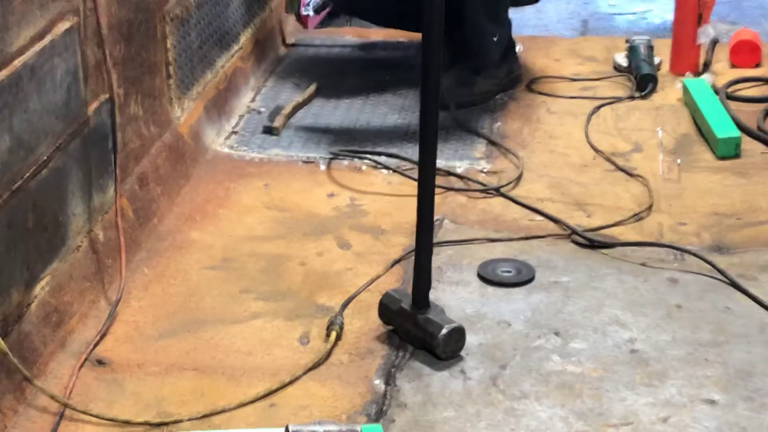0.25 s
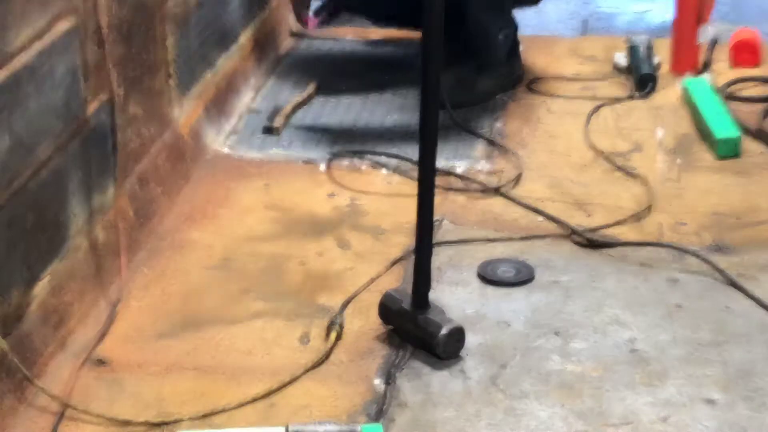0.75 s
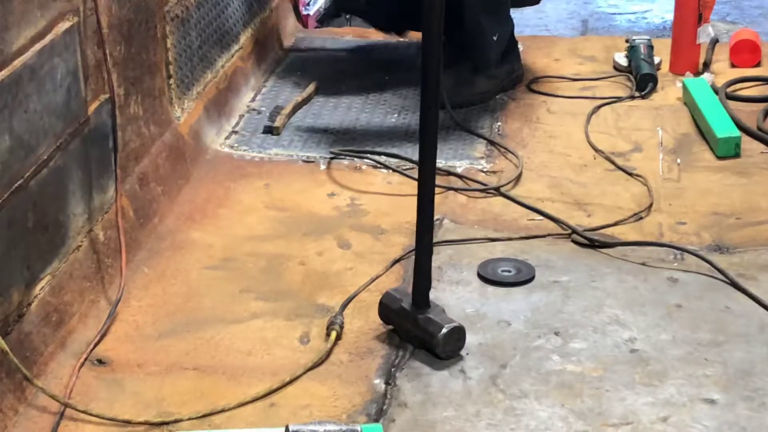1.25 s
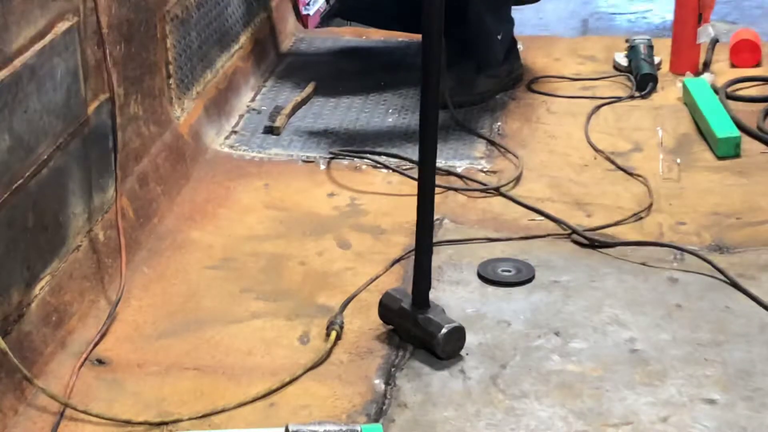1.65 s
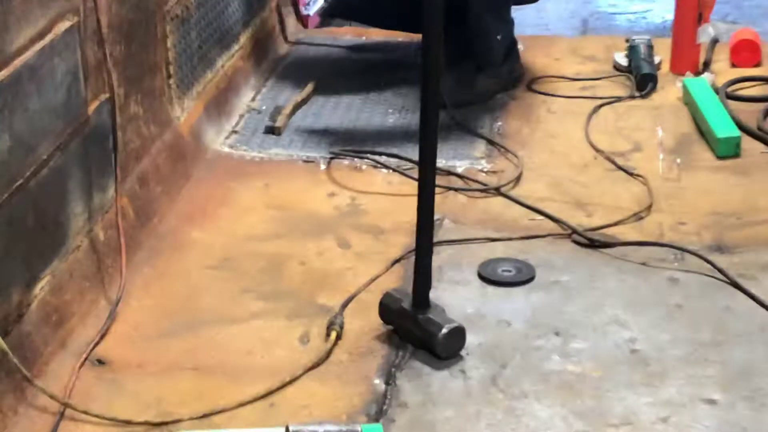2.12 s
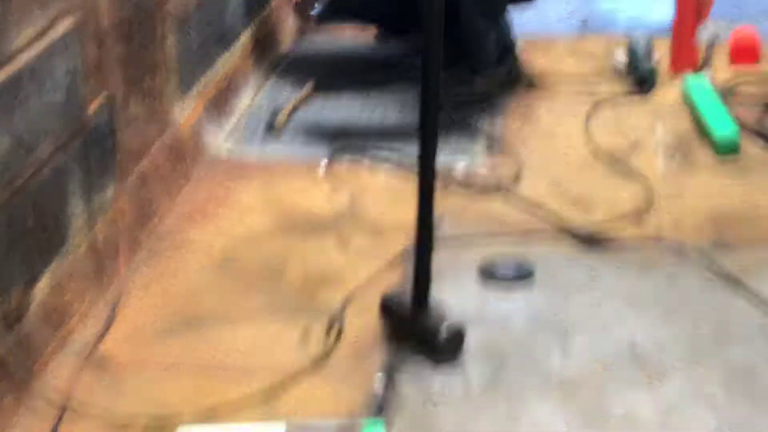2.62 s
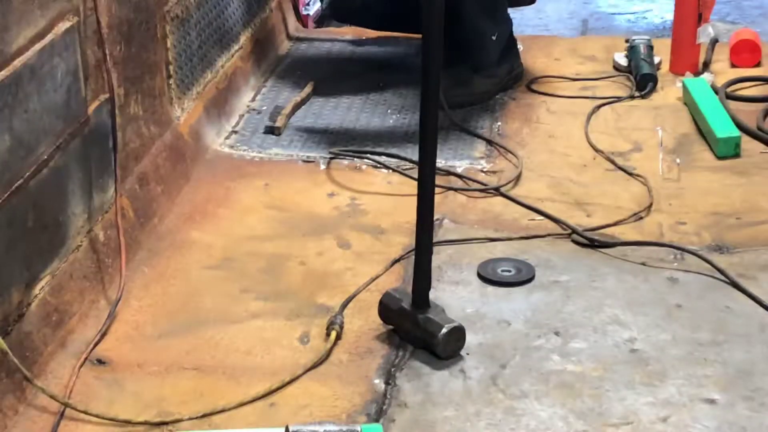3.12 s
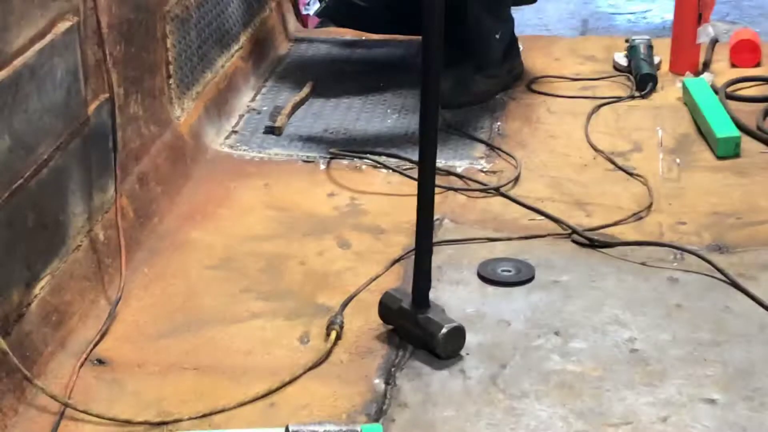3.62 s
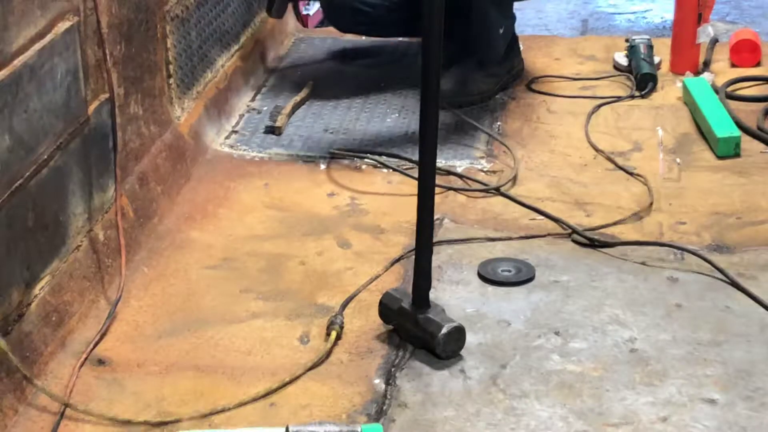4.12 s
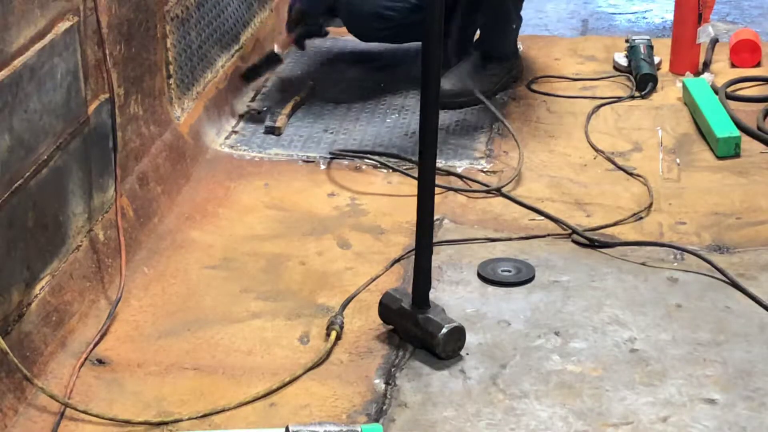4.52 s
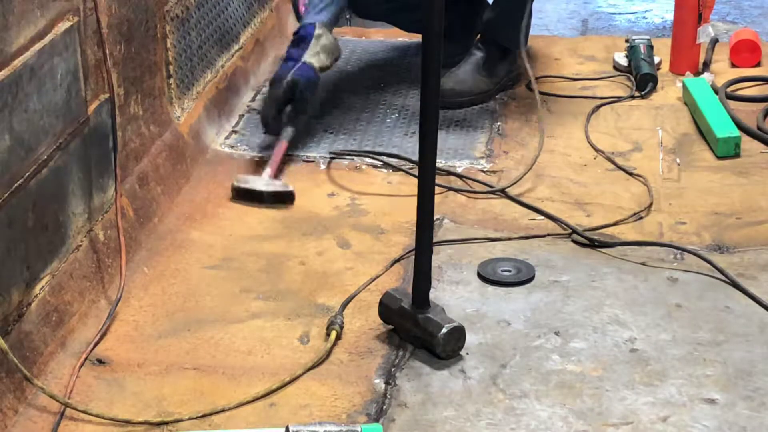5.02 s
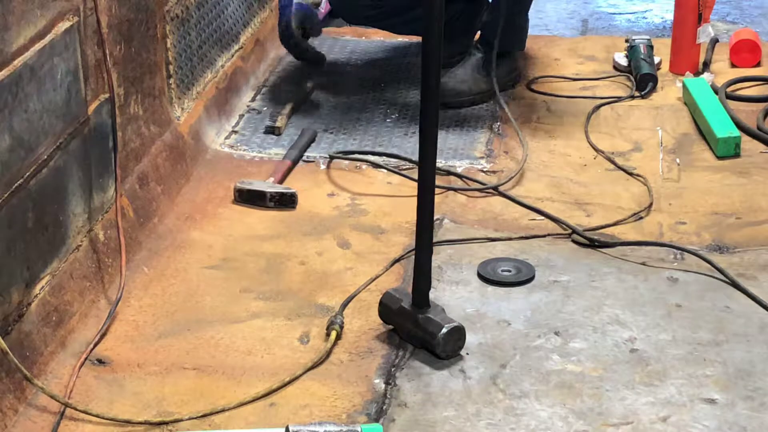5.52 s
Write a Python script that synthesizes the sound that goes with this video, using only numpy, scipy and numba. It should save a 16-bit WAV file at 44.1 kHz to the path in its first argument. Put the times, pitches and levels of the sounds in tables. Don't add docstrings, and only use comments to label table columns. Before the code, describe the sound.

Seven evenly spaced hammer blows ring loudly on steel plating, then the hammer is dropped and rocks to rest with small ticks.

```python
import sys
import numpy as np
from scipy import signal
from scipy.fft import rfft, irfft
from scipy.io import wavfile
from scipy.ndimage import uniform_filter1d
from numba import njit

SR = 44100
rng = np.random.default_rng(int(sys.argv[2]) if len(sys.argv) > 2 else 0)


def voltage_ratio(decibels):
    exponent = np.asarray(decibels, float) / 20
    return 10 ** exponent


def generate_wav(signal):
    frames = np.transpose(np.atleast_2d(signal))
    scaled = np.clip(frames, -1, 1) * 32767
    pcm = np.round(scaled).astype(np.int16)
    wavfile.write(sys.argv[1], SR, pcm)


N = 253927
T = np.arange(N) / SR
BINS_HZ = np.arange(1, N // 2 + 2) * SR / N


def over_hz(table, hz, column=1):
    table = np.array(table, float)
    return np.interp(np.log(hz), np.log(table[:, 0]), table[:, column])


def noise(spectrum):
    white = rfft(rng.standard_normal(N))
    x = irfft(white * voltage_ratio(over_hz(spectrum, BINS_HZ)), N)
    return x / x.std()


def yard_hum():
    # frequency in Hz, level in dB per Hz.
    hum_colour = [(15, -62), (25, -24), (113, -5), (148, -10), (261, -9), (291, -11), (333, -3), (371, -7),
                  (903, -13.5), (1010, -15.5), (1320, -15.5), (2800, -32.5), (3670, -26.5), (5970, -37.5),
                  (15800, -59.5)]
    return voltage_ratio(-38.5) * noise(hum_colour)


@njit
def ring(starts, gains, slow, fast, n):
    out = np.zeros(n)
    for m in range(len(slow)):
        a, b, k = 0j, 0j, 0
        for i in range(starts[0], n):
            if k < len(starts) and i == starts[k]:
                a = a + gains[k, m]
                b = b + gains[k, m]
                k += 1
            a = a * slow[m]
            b = b * fast[m] + 1e-20
            if i >= 0:
                out[i] += (a - b).imag
    return out


def start_samples(hits):
    return np.round(hits[:, 0] * SR).astype(np.int64)


def colour_db(hits, law, hz):
    _, _, db, spot, give = hits.T[..., None]
    return db + spot * over_hz(law, hz) + give * over_hz(law, hz, column=2)


def modes(starts, hz, db, t60, fill_s, scatter):
    chance = rng.standard_normal(db.shape + (2,))
    gains = voltage_ratio(db + scatter * chance[..., 0]) * np.exp(2j * chance[..., 1])
    slow = np.exp(2j * np.pi * hz / SR - np.log(1000) / (t60 * SR))
    fast = slow * np.exp(-1 / (fill_s * SR))
    return ring(starts, gains, slow, fast, N)


def plating(hits, law, spectrum, times, panels, db, blur_db):
    starts = start_samples(hits)
    count, top_hz = 330, 2000
    hz = 40 + (top_hz - 40) * (np.arange(count) + rng.random(count)) / count
    t60 = over_hz(times, hz) * voltage_ratio(1.15 * rng.standard_normal(count))
    field_db = db + over_hz(spectrum, hz) + colour_db(hits, law, hz)
    out = modes(starts, hz, field_db, t60, over_hz(times, hz, column=2), scatter=3.51)

    hz, panel_db, t60, swell_s, spot_db = np.transpose(panels)
    panel_db = panel_db + colour_db(hits, law, hz) + np.outer(hits[:, 3], spot_db)
    out = out + modes(starts, hz, panel_db, t60, swell_s, scatter=0.74)

    white = rfft(rng.standard_normal(N)) * voltage_ratio(db + blur_db + over_hz(spectrum, BINS_HZ))
    clusters = uniform_filter1d(rng.standard_normal(len(BINS_HZ)), size=250)
    white = white * voltage_ratio(1.3 * clusters / clusters.std())
    edges = top_hz * 2 ** (np.arange(19) / 6)
    for lo, hi in zip(edges[:-1], edges[1:]):
        mid = np.sqrt([lo * hi])
        slow = np.exp(-np.log(1000) / (over_hz(times, mid) * SR)) + 0j
        fast = slow * np.exp(-1 / (over_hz(times, mid, column=2) * SR))
        envelope = ring(starts, 1j * voltage_ratio(colour_db(hits, law, mid)), slow, fast, N)
        out = out + envelope * irfft(white * ((BINS_HZ >= lo) & (BINS_HZ < hi)), N)
    return out


def cracks(hits, edges, peaks, rise_s, fall_s, lead_s, lead_db, broad_db, top_hz):
    burst, ahead = np.zeros((3, N)), np.zeros(N)
    for s, db, _, spot, _ in hits:
        low_db, high_db = (base_db + spot * step_db for base_db, step_db in edges)
        age = np.maximum(T - s, 0)
        shape = (1 - np.exp(-age / rise_s)) * np.exp(-(age / fall_s) ** 2)
        burst += voltage_ratio(db + np.array([[low_db + 6], [0], [high_db + 6]])) * shape
        ahead += voltage_ratio(db + lead_db) * np.exp(-np.abs(T - s) / lead_s) * (T > s - 2.5 * lead_s)

    grit = rng.standard_normal(N) * voltage_ratio(2.2 * rng.standard_normal(N))
    rung = voltage_ratio(broad_db) * grit
    for hz, width, db in peaks:
        rung = rung + voltage_ratio(db) * signal.lfilter(*signal.iirpeak(hz, hz / (1.9 * width), SR), grit)
    rung = signal.lfilter(*signal.butter(2, top_hz, fs=SR), rung)
    low = signal.filtfilt(*signal.butter(2, 3200, fs=SR), rung)
    high = signal.filtfilt(*signal.butter(2, 5500, "high", fs=SR), rung)
    bands = [low, rung - low - high, high]
    steel = noise([(150, -13), (450, 2.5), (1500, -7.0), (4200, -8.0), (7000, -16.0), (15000, -32.0)])
    return np.sum(burst * bands, axis=0) / rung.std() + ahead * steel


def hammer_head(hits, db):
    # frequency in Hz, level in dB, time to fall 60 dB in seconds.
    head_modes = [(1748, -4.5, 0.051), (2283, -5, 0.052), (3280, -15, .04), (3821, -13, .05),
                  (4034, -4, 0.074), (4380, -3.5, 0.039), (4786, -8.5, 0.036), (5800, -12, 0.038),
                  (8100, -11.5, 0.032)]
    hz, mode_db, t60 = np.transpose(head_modes)
    fill_s = np.full(len(hz), 0.0021)
    return modes(start_samples(hits), hz, db + mode_db + hits[:, 1:2], t60, fill_s, scatter=2.9)


def hammer_blows():
    # start in seconds, crack in dB, ring in dB, spot from -1 near the frame to 1 mid-panel,
    # give from -1 stiff to 1 booming.
    struck = [
        (0.1014, -9.5, -4, -0.54, 0.91),
        (0.6989, -7.5, -6.5, 0.67, 0.72),
        (1.324, -10, -5.5, -0.73, .7),
        (1.951, -11.5, -5.5, -1.2, -.3),
        (2.6021, -6, -5, 0.85, -0.97),
        (3.2388, -9.5, -5.5, 0.95, -0.46),
        (3.918, -9.5, -5.5, -0.7, -0.12),
    ]
    earlier_blow = (-0.399, -8, -3.5, -1.7, 0.3)
    # frequency in Hz, level in dB per Hz.
    deck = [(24, -47), (40, -28), (123, -14), (236, -13), (274, -14.5), (343, -4.5), (399, -12),
            (525, -4.5), (626, -10.5), (784, -15.5), (1290, -16.5), (1700, -25), (5110, -28.5),
            (7630, -37.5), (15800, -48.5)]
    # frequency in Hz, time to fall 60 dB in seconds, time to fill the plating in seconds.
    deck_times = [(50, 1.2, 0.076), (130, 1.25, 0.05), (351, 0.869, 0.028), (590, 1.014, 0.025),
                  (1068, 1.19, 0.02), (2060, 1.305, 0.0087), (6350, 0.98, 0.0071), (13780, 0.47, 0.0133)]
    # frequency in Hz, level in dB, time to fall 60 dB in
    # seconds, swell in seconds, dB gained mid-panel.
    deck_panels = [(62.8, -20.5, 1.56, 0.047, -2), (93, -20, 1.55, 0.064, 1.5),
                   (119.4, -19.5, 0.78, 0.039, -4.5), (164, -12.5, 0.089, 0.0011, 1),
                   (209, -9, 0.26, 0.0023, 2), (235.4, -18, 0.9, 0.027, 1), (245.2, -7, 0.61, 0.022, 0),
                   (283.7, -17.5, 0.88, 0.052, -6.5), (313.7, -16.5, 1.17, 0.021, 1.5),
                   (331.6, -9.5, 0.83, 0.049, 4.5), (352.5, -18, 0.28, 0.062, -8),
                   (374, -12, 0.63, 0.065, -10), (425.3, -10.5, 0.76, 0.039, 0),
                   (473.6, -8, 0.5, 0.038, 5.5), (507, -11, 0.63, 0.016, -7.5), (531.7, -8, 0.69, 0.024, 9),
                 (543, -7, 0.3, 0.036, -5.5), (577, -13, 1.05, 0.01, -3.5), (592, -16.5, 1.22, 0.026, 3.5),
                 (684.6, -12, 0.85, 0.04, -1), (706, -30, 0.85, 0.037, 16), (758, -22, 1.62, 0.07, 1.5),
                 (938, -17.5, 1.1, 0.06, -6), (1090, -24.5, 1.18, 0.016, 8),
                 (1150, -18.5, 0.83, 0.033, 0.5), (1135, -18, 1.25, 0.029, -3),
                 (1338, -28, 0.9, 0.022, -10.5)]
    # frequency in Hz, dB per unit of spot, dB per unit of give.
    ring_law = [(90, -0.8, -1.5), (277.7, -0.7, 4), (574, 0.42, -0.25), (1100, 2, -1.5), (1440, -0.4, 1.1),
                (2170, 0.5, -2.1), (8250, -0.9, 2.35)]
    # dB against its middle, dB per unit of spot.
    crack_edges = [(-1.5, -2.3), (-5.5, -4.5)]
    # frequency in Hz, width in Hz, level in dB.
    crack_peaks = [(1470, 330, 16), (2300, 220, 15), (3260, 400, 8), (3957, 250, 19), (4594, 190, 13.5),
                   (5820, 180, -25), (7820, 97, 11.5), (7900, 220, -46.5)]
    struck = np.array(struck)
    ringing = np.vstack([earlier_blow, struck])
    panels = np.array(deck_panels)
    out = plating(ringing, ring_law, deck, deck_times, panels, db=-11, blur_db=33.5)
    out = out + cracks(struck, crack_edges, crack_peaks, rise_s=0.0014, fall_s=0.011,
                       lead_s=0.0046, lead_db=-3.0, broad_db=-25, top_hz=9900)
    return out + hammer_head(struck, db=1.0)


def dropped_hammer():
    # start in seconds, tick in dB, ring in dB, spot from -1 near the frame to 1 mid-panel,
    # give from -1 stiff to 1 booming.
    contacts = [
        (4.8842, -47, -40, .5, -.6),
        (4.9164, -23.5, -6.5, .5, -.4),
        (4.9538, -20.5, -7.5, 0.73, .5),
        (5.025, -24.5, -8, 0.9, .1),
        (5.0744, -28.5, -17, -0.17, -0.73),
        (5.1644, -32, -12, -1.2, 0.097),
        (5.2798, -48, -18, -0.75, 0.72),
        (5.3596, -37, -20, -1, 0.66),
    ]
    # frequency in Hz, level in dB per Hz.
    drop_deck = [(24, -67), (40, -34), (69, -23.5), (158, -13), (236, -3.5), (274, -8), (389, -9),
                 (430, -10), (626, -13.5), (3340, -35.5), (15800, -57.5)]
    # frequency in Hz, time to fall 60 dB in seconds, time to fill the plating in seconds.
    drop_times = [(60, 4.2, 0.042), (242, 0.72, 0.0064), (600, 1.11, 0.0019), (1500, 0.68, 0.0038),
                  (5000, 0.54, 0.0032), (9000, 0.26, 0.016), (14000, .2, .015)]
    # frequency in Hz, level in dB, time to fall 60 dB in seconds,
    # swell in seconds, dB gained mid-panel.
    drop_panels = [(218, -11, 0.3, 0.0142, 1), (229.3, -16.5, 0.33, 0.0087, 13),
                   (242.7, -12, 0.52, .008, 10.5), (317, -27, 0.53, .01, -3), (430, -14, 0.56, 0.009, 0.5),
                   (536, -11, 0.18, 0.0017, 4.5), (1410, -21.5, 0.18, 0.00206, 0)]
    # frequency in Hz, dB per unit of spot, dB per unit of give.
    ring_law = [(90, 0, -2), (287, -1.6, 9.5), (550, -1, -7.5), (1100, -1, 5), (1700, 1.3, 0.5),
                (8000, 7.5, -3.1)]
    # dB against its middle, dB per unit of spot.
    tick_edges = [(-7, -1.2), (-2.5, -1.2)]
    # frequency in Hz, width in Hz, level in dB.
    tick_peaks = [(1318, 58, 9), (2010, 91, -15), (2340, 130, -12), (3470, 290, -10), (4690, 130, -23.5),
                  (6070, 110, -11.5)]
    contacts = np.array(contacts)
    out = plating(contacts, ring_law, drop_deck, drop_times, drop_panels, db=-20.0, blur_db=28.5)
    out = out + cracks(contacts, tick_edges, tick_peaks, rise_s=0.0014, fall_s=0.017,
                       lead_s=0.0015, lead_db=-9, broad_db=-30, top_hz=3600)
    return out + hammer_head(contacts[1:2], db=-8)


def gesture(s, attack_s, hold_s, release_s):
    age = np.maximum(T - s, 0)
    return (1 - np.exp(-age / attack_s)) * np.exp(-np.maximum(age - hold_s, 0) / release_s)


def wander(size):
    drift = uniform_filter1d(uniform_filter1d(rng.standard_normal(N), size=size), size=size)
    return drift / drift.std()


def rustle():
    # start in seconds, cloth in dB, hold in seconds, thin cable squeak in dB.
    moves = [
        (4.95, -46.5, 0.095, -66),
        (5.135, -59, 0.18, -62.5),
        (5.36, -54.5, .15, -69),
        (5.54, -49.5, 0.15, -64),
    ]
    # frequency in Hz, level in dB per Hz.
    cloth_colour = [(1180, -28), (2000, -1), (2120, 0), (2370, -6), (4160, -6), (4570, -8.5), (5500, -6),
                    (7580, -10), (9120, -18.5), (15000, -28)]
    cloth = noise(cloth_colour)
    squeak_hz, squeak_width_hz = 7800, 500
    squeak_filter = signal.iirpeak(squeak_hz, squeak_hz / squeak_width_hz, SR)
    squeak = signal.lfilter(*squeak_filter, rng.standard_normal(N))
    squeak = squeak / squeak.std()
    out = np.zeros(N)
    for s, db, hold_s, thin_db in moves:
        envelope = gesture(s, 0.035, hold_s, 0.16)
        out += envelope * (voltage_ratio(db) * cloth + voltage_ratio(thin_db) * squeak)
    return out * voltage_ratio(0.96 * wander(2500))


def settle():
    # frequency in Hz, level in dB.
    plate_hum = (116, -31)
    hz, db = plate_hum
    envelope = gesture(5.21, attack_s=0.05, hold_s=0.3, release_s=0.13)
    return envelope * voltage_ratio(db + 1.6 * wander(1500)) * np.sin(2 * np.pi * hz * T)


def scene():
    return (yard_hum() + hammer_blows() + dropped_hammer() + rustle() + settle())[None]


@njit
def limiter_gain(x, top, ratio, attack, release):
    gain, e = np.ones(len(x)), 0.
    for i in range(len(x)):
        e += (abs(x[i]) - e) * (attack if abs(x[i]) > e else release)
        if e > top:
            gain[i] = (top / e) ** (1 - 1 / ratio)
    return gain


def top_cut(x):
    return signal.sosfilt(signal.butter(12, 15900, fs=SR, output="sos"), x)


def record(dry):
    # frequency in Hz, level in dB.
    microphone = [(20, 0), (6500, 0), (7900, 2.5), (8250, -1.5), (8600, -1.5), (12000, -2), (20000, -5)]
    dry = irfft(rfft(dry) * voltage_ratio(over_hz(microphone, BINS_HZ)), N)
    dry = signal.lfilter(*signal.butter(2, 38, "high", fs=SR), dry)
    ahead = np.append(dry[0, 40:], np.zeros(40))
    gain = limiter_gain(ahead, 0.69, 13.3, 0.025, 1 / (0.07 * SR))
    ceiling = 0.84
    limited = np.clip(dry * gain, -ceiling, ceiling)
    treble_cut = signal.ellip(10, 0.1, 80, 15750, fs=SR, output="sos")
    return top_cut(signal.sosfilt(treble_cut, limited))


dry = scene()
out = record(dry)
generate_wav(out)
```